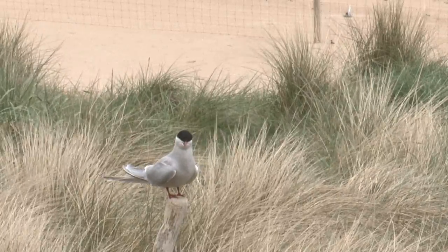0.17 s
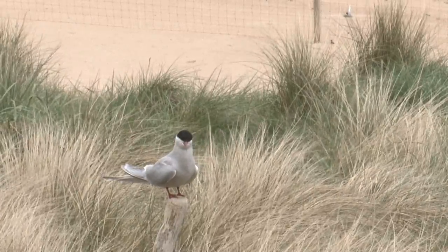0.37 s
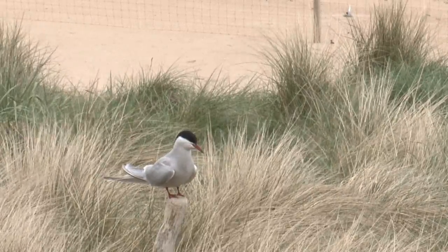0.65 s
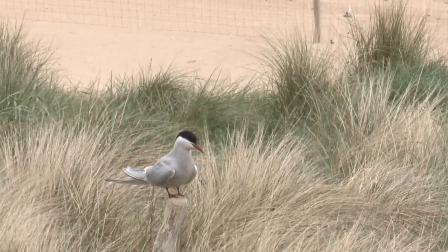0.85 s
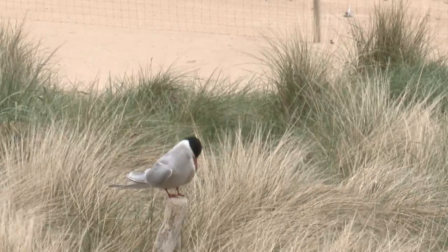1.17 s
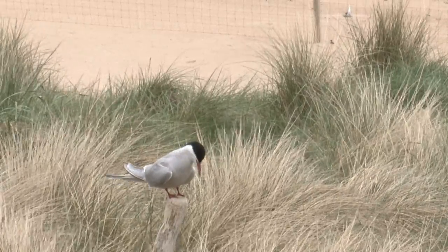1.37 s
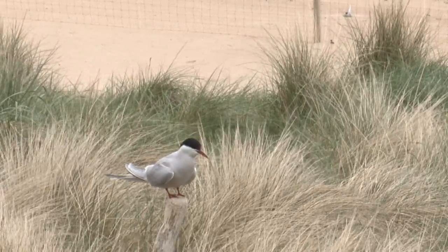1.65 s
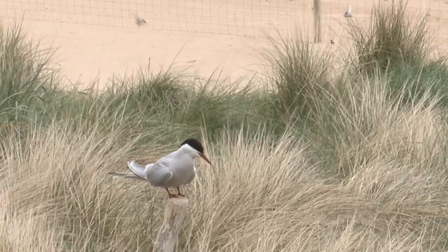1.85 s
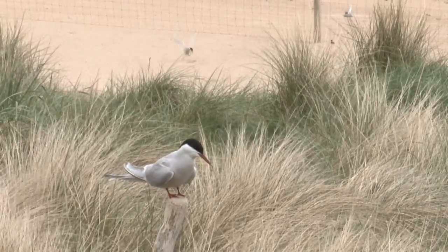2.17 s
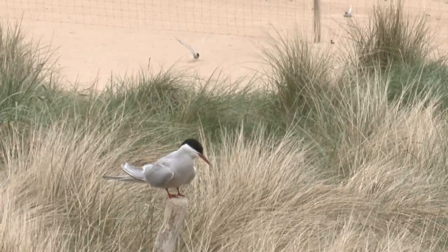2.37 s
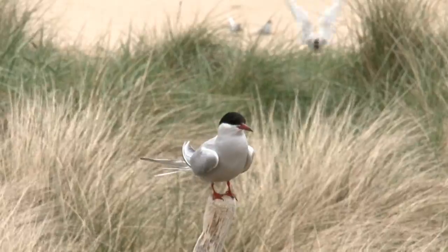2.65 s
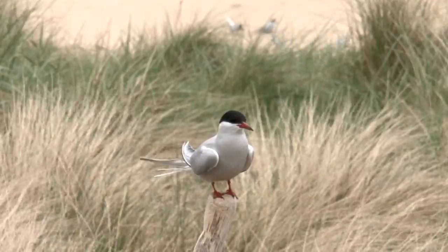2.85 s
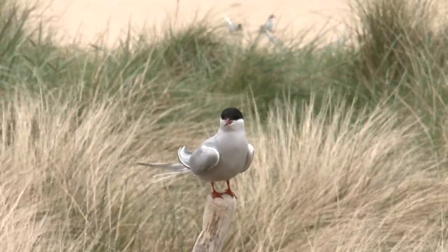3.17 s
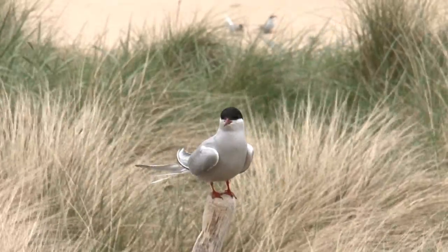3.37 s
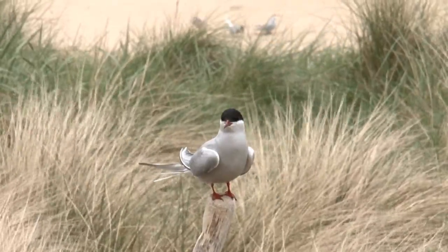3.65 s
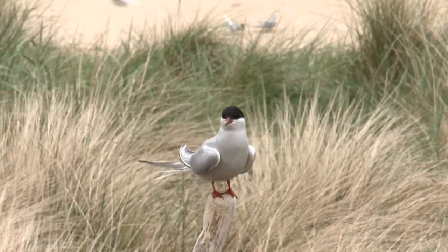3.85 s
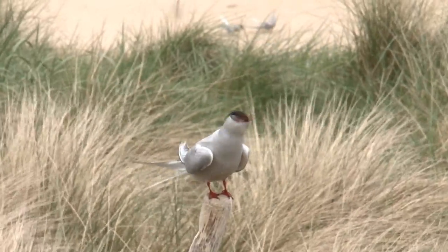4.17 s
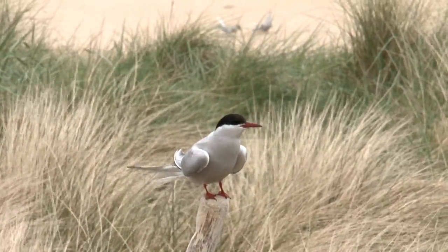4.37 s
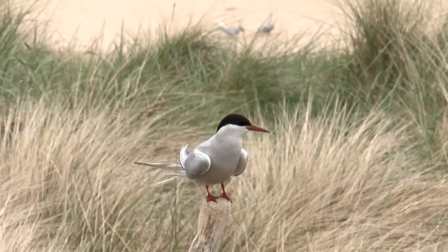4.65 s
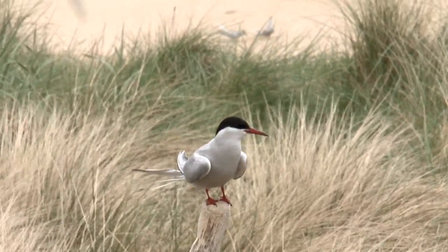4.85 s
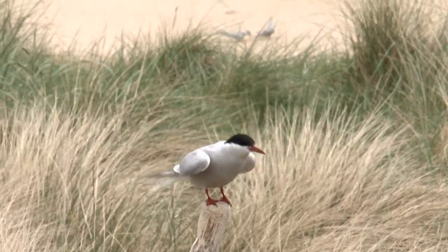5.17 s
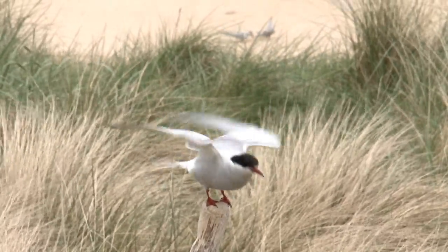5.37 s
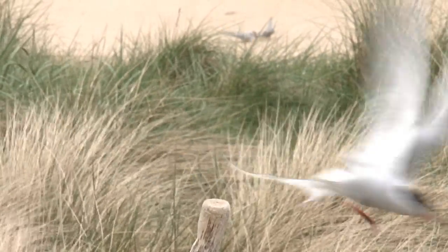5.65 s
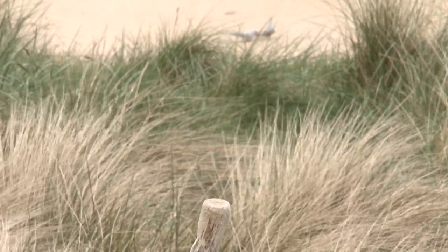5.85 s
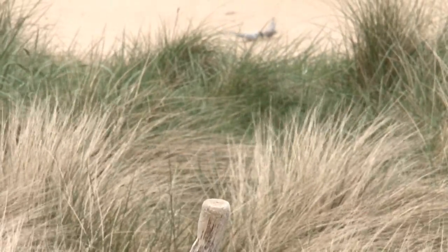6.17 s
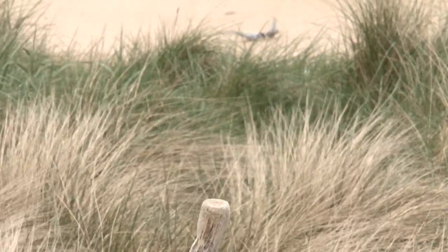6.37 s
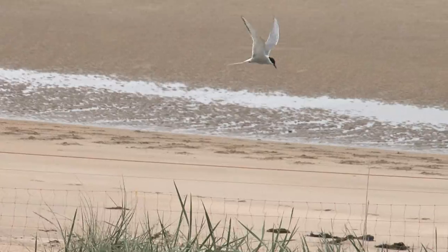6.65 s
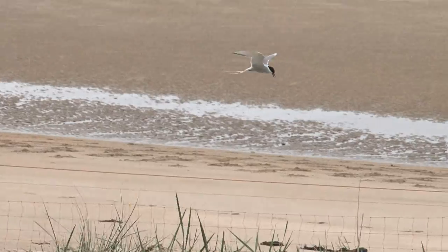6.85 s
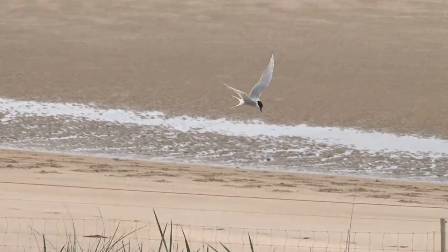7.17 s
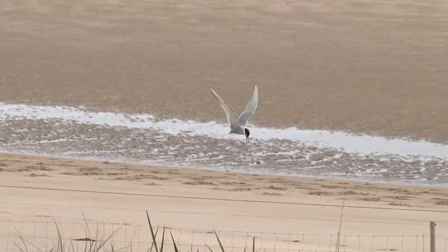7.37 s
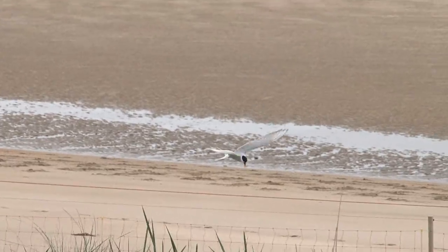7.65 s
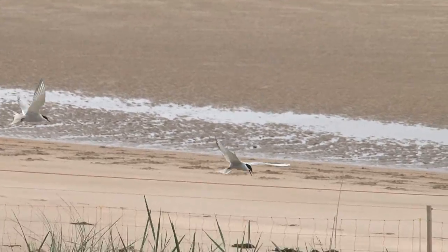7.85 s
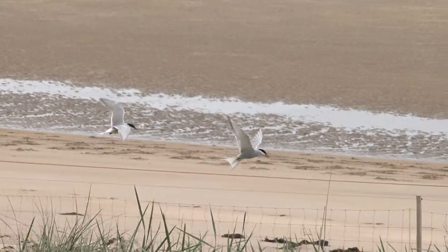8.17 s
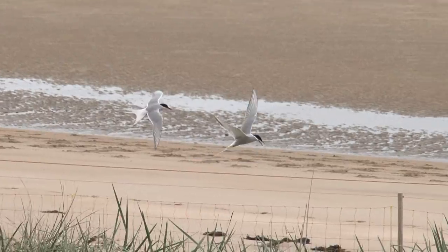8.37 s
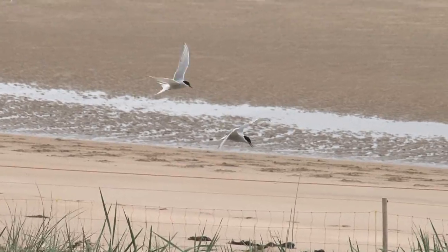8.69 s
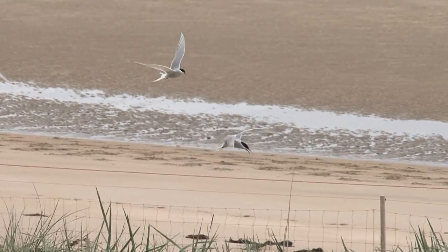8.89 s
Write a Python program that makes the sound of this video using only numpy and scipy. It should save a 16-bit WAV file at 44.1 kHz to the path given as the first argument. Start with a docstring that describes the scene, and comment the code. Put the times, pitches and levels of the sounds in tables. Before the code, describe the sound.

A dense, unbroken chorus of terns calling at once in coastal dunes, shrill chopped kee cries and rasping growls over faint surf.

```python
"""Near terns of a dune colony call: arched whistles with harmonics, chopped into trills ("kee"), and
rasping growls ("arr"), trains of noisy membrane snaps coloured by throat and beak bands.
Hundreds of farther calls by the same rules, and a band of fluttering noise, fuse into a chorus.
Filtered noise gives the surf beyond the dunes and two puffs of wind; wavering sines give a faint low drone.
An almost mono microphone hears it all."""
import sys
import numpy as np
from scipy import signal
from scipy.fft import rfft, irfft, next_fast_len
from scipy.io import wavfile
from scipy.ndimage import uniform_filter1d

SR = 44100
rng = np.random.default_rng(int(sys.argv[2]) if len(sys.argv) > 2 else 0)


def persist_wave(psi):
    """Save psi, clipped to +-1, as 16-bit WAV."""
    counts = np.round(np.clip(psi, -1, 1) * 32767).astype(np.int16)
    wavfile.write(sys.argv[1], SR, np.atleast_2d(counts).T)


N = 397782
TIME = np.arange(N) / SR

# near growls: [start t/s, length t/s, mean burst rate f/Hz, throat level/dB of the buzz before gating,
# beak level/dB and treble level/dB over the throat]
NEAR_GROWLS = [(0, 0.145, 90.2, -29, -1, -20), (0.589, 0.18, 94.7, -29, -5.5, -21),
               (1.114, 0.046, 63, -36, -2, -20), (1.215, 0.14, 63.4, -39, -2, -7.5),
               (1.352, 0.17, 67, -32.5, -4.5, -30), (1.642, 0.26, 66.9, -35, -0.5, -21),
               (2.01, 0.04, 65.5, -32, -19, -17), (3.132, 0.086, 73.44, -30, -7, -22),
               (3.617, 0.061, 59.6, -30.5, -12, -23), (3.727, 0.21, 58, -30.5, -7.5, -34),
               (4.275, 0.13, 73.7, -27, -7.5, -29), (4.39, 0.055, 56, -45, -10, -14),
               (4.455, 0.17, 52, -46, 6, -8), (4.818, 0.1, 67.8, -30, 0.5, -20),
               (5.14, 0.037, 60.19, -30, -5, -23), (5.208, 0.11, 73.4, -26.5, -26, -27),
               (5.319, 0.14, 57, -32, -7, -20), (6.085, 0.11, 62, -42, 2, -8),
               (6.138, 0.14, 44.2, -29.5, -5, -17), (6.298, 0.086, 59.5, -30, -2.5, -19),
               (7.45, 0.14, 72.3, -31, -9, -21), (7.996, 0.13, 54, -30, -5, -17),
               (8.5, 0.185, 92, -26, -8.5, -22.5), (8.894, 0.04, 23, -29.5, -4, -20)]
# growl bands, as filter points [f/Hz, level/dB]: throat, open beak, and the treble that near birds add
THROAT_BAND = [(900, -50), (1700, -12), (2300, -5), (3000, 6), (3700, -9), (4500, -19), (6000, -62)]
BEAK_BAND = [(3000, -20.5), (4000, 6), (4600, 4), (5500, -1.5), (6800, -6.5), (7600, -40)]
TREBLE_BAND = [(6500, -49), (7800, 8.5), (9500, 11.5), (11500, 2), (13500, -4), (15000, -48)]
# near cries: [start t/s, length t/s, pitch f/Hz at the onset, settled, at the end, level/dB before flicker,
# 2nd harmonic level/dB over the 1st, mean trill rate f/Hz, trill depth 0-1]
NEAR_CRIES = [(0.005, 0.098, 3100, 3550, 2500, -33, -12, 92, 0.44),
              (0.175, 0.051, 3050, 3100, 3600, -34, -6, 45.4, 1),
              (0.235, 0.2, 3450, 3660, 3480, -33, -20, 78, .25),
              (0.37, 0.13, 2750, 2450, 2140, -34, -22, 57.6, 1),
              (0.441, 0.16, 3046, 3170, 3300, -33.5, -11, 50.6, .7),
              (0.55, 0.235, 3550, 3940, 3300, -31.5, -18, 48, .9),
              (0.595, 0.075, 3250, 3340, 3200, -32, -6, 53, 1),
              (0.758, 0.23, 3520, 3500, 3560, -32.5, -19, 94.2, 1),
              (0.991, 0.13, 3180, 3200, 3300, -34, -15, 54, 1),
              (1.129, 0.11, 2884, 3280, 3200, -31, -3, 60, 1),
              (1.245, 0.051, 2900, 3400, 2500, -31, -7.5, 62.3, 0.9),
              (1.203, 0.2, 3440, 3340, 3330, -31.5, -16.5, 39.3, 1),
              (1.455, 0.15, 3250, 3800, 3200, -41, -8, 95, 0.66),
              (1.476, 0.072, 3460, 3900, 2500, -40, -9, 48, 1),
              (1.6, 0.24, 3250, 3400, 2980, -30, -16.5, 60.2, 1),
              (1.657, 0.025, 2850, 3100, 2940, -32, 0, 69, 0.9),
              (1.802, 0.08, 2930, 2750, 3500, -39, -7, 67, .85),
              (1.914, 0.043, 3830, 3930, 3810, -33, -43, 43, 0.05),
              (1.941, 0.076, 3020, 3040, 2850, -37, -11, 54, 1),
              (2.145, 0.24, 2650, 2970, 2670, -34.5, -16, 96.2, 1),
              (2.01, 0.18, 3150, 3180, 2720, -40, -4, 36, .9),
              (2.062, 0.125, 3340, 3450, 3260, -42, -4, 55, 1),
              (2.066, 0.065, 2620, 2750, 2680, -44, 0, 45, .2),
              (2.33, 0.18, 3600, 3900, 3650, -35.5, -12.5, 44, .9),
              (2.359, 0.23, 3590, 3400, 3240, -33, -18, 97.5, 1),
              (2.52, 0.09, 3630, 3900, 2900, -36, -21, 44, 0.4),
              (2.6, 0.17, 3400, 3400, 3100, -32, -16, 47.8, 0.95),
              (2.8, 0.033, 2900, 3600, 3150, -34, -6, 50, .1),
              (2.826, 0.11, 2900, 3260, 2780, -32.5, -8, 60, 1),
              (2.93, 0.2, 3400, 3460, 3330, -31, -14, 65, .8),
              (2.965, 0.2, 3250, 3310, 3150, -29.5, -14, 45, .87),
              (3.167, 0.18, 3300, 2930, 2700, -27.5, -14, 53, 0.92),
              (3.21, 0.18, 3350, 3640, 3250, -43, -2, 60, 1),
              (3.399, 0.25, 2950, 2850, 3500, -36.5, -30, 90, 0.7),
              (3.438, 0.055, 3850, 3940, 3800, -35, -40, 70, .1),
              (3.57, 0.024, 2530, 2300, 2200, -32, -38, 50, .1),
              (3.62, 0.11, 3290, 2950, 3200, -36, -17, 46.5, .95),
              (3.716, 0.24, 3330, 3500, 3800, -36, -16, 52.3, 0.57),
              (3.744, 0.25, 2670, 2900, 2900, -32.5, -17, 55.4, 1),
              (3.842, 0.16, 3390, 3440, 2900, -33, -15.5, 50.3, 0.42),
              (3.926, 0.11, 2900, 3400, 2920, -36, -14, 58, 0.9),
              (3.985, 0.19, 3250, 3650, 3270, -29, -11, 36, .9),
              (4.169, 0.13, 3550, 3200, 3400, -30, -23, 71, .8),
              (4.22, 0.16, 3350, 3540, 3270, -32, -8, 100, .4),
              (4.385, 0.079, 3740, 3700, 3600, -35, -21, 61, 0.4),
              (4.405, 0.055, 2850, 3260, 3020, -28, -12, 50, .2),
              (4.453, 0.15, 4380, 4430, 3800, -34, -30, 56, 1),
              (4.575, 0.255, 3450, 3690, 3330, -28.5, -8, 48, 1),
              (4.645, 0.061, 3670, 3730, 3660, -28, -33, 48, .1),
              (4.779, 0.12, 3100, 3530, 3070, -27, -29, 59, 0.98),
              (4.881, 0.22, 3220, 3420, 2730, -30, -11, 45.7, 0.76),
              (5.047, 0.074, 3260, 2800, 3050, -30, -22, 104, .86),
              (5.075, 0.11, 3050, 3270, 3100, -34.5, -10, 42, .2),
              (5.118, 0.12, 2900, 2900, 2100, -32, -23, 91.7, 1),
              (5.115, 0.17, 3380, 3520, 3230, -33, -9, 45, .85),
              (5.2, 0.1, 3320, 3330, 3250, -28.5, -22, 39, .5),
              (5.283, 0.15, 3050, 3000, 2880, -33.5, -7, 50.4, .93),
              (5.421, 0.069, 2850, 3200, 2300, -33, -26, 56.5, 1),
              (5.507, 0.14, 3100, 3440, 2800, -35, -13, 74.3, 1),
              (5.553, 0.17, 2930, 2860, 3000, -34, -20, 53.7, 1),
              (5.581, 0.124, 3340, 3560, 3450, -35, -17, 46.3, 1),
              (5.855, 0.12, 3080, 3280, 3250, -40, -24, 70, 0.6),
              (5.948, 0.12, 2880, 3430, 3350, -30, -8, 68, .9),
              (5.99, 0.225, 2520, 2990, 2720, -33, -8, 42, .8),
              (6.04, 0.29, 3200, 3160, 3340, -27, -17, 67, 0.76),
              (6.09, 0.22, 3400, 3470, 3300, -31, -11, 65, .8),
              (6.241, 0.18, 3120, 3460, 2470, -32, -17, 42, .95),
              (6.632, 0.17, 2900, 2840, 2700, -39.5, -9, 65, 0.7),
              (6.769, 0.12, 2850, 3300, 2400, -37, -6, 63.5, 0.9),
              (6.823, 0.099, 3340, 3520, 3700, -37, -14, 39, .7),
              (6.867, 0.1, 3140, 3260, 3200, -34.5, -12, 46.7, 1),
              (6.984, 0.097, 2870, 2930, 2700, -35, -9, 78, .83),
              (7.036, 0.125, 3790, 3780, 3650, -28, -15.5, 39, .1),
              (7.132, 0.19, 3320, 3500, 3300, -31, -18, 63, 0.74),
              (7.31, 0.097, 2970, 3450, 3300, -35.5, -11, 46, .65),
              (7.39, 0.065, 3900, 3700, 3200, -41, -10, 50, 0.05),
              (7.06, 0.046, 2900, 3300, 3500, -38, -4, 50, .1),
              (6.44, 0.07, 3200, 3550, 3700, -47, -8, 45, .8),
              (6.46, 0.22, 3550, 3500, 3050, -44, -29, 44.4, 0.4),
              (7.72, 0.15, 3330, 3480, 3200, -30.5, -15, 39, .8),
              (7.87, 0.21, 3250, 3300, 2950, -29.5, -14, 38, .8),
              (7.65, 0.29, 3100, 3220, 3150, -36.5, -14, 90.3, 0.76),
              (8.079, 0.2, 3380, 3470, 3440, -31, -21.5, 76.3, .68),
              (8.235, 0.255, 2750, 3140, 2680, -30, -9, 42, .9),
              (8.357, 0.15, 3480, 3460, 3000, -34.5, -10, 47, 0.9),
              (8.417, 0.042, 3900, 3940, 3480, -32, -8, 50, .1),
              (8.455, 0.09, 3500, 3420, 3260, -34, -9, 50, .2),
              (8.68, 0.032, 2980, 3200, 2880, -27, -16, 40, .1),
              (8.682, 0.081, 2620, 2440, 2700, -38, -28, 83, .67),
              (8.72, 0.12, 3500, 3600, 3900, -39.5, -17, 87, .56),
              (8.742, 0.04, 3050, 3600, 3150, -42, -6, 50, .1),
              (8.797, 0.028, 2900, 2800, 2600, -31, -12, 40, .1),
              (8.802, 0.04, 2850, 3480, 2950, -40, -5, 50, .1),
              (8.828, 0.098, 3520, 3600, 3700, -35, -27, 51, 0.9),
              (8.92, 0.13, 3000, 3300, 3100, -31.5, -11, 83.5, 0.73)]
# far chorus over time: [t/s, reference level/dB, nearness as treble level/dB]
FAR_CHORUS = [(0.0, -28.5, -4), (2.28, -30, -7), (3.04, -27, -7.5), (3.64, -33.5, -10), (3.97, -26, -7.5),
              (5.33, -26.5, -10), (5.93, -30, -8), (6.18, -28, -12), (6.48, -27, -9.5), (8.44, -28.5, -10),
              (9.02, -29.5, -15)]
# spectrum of the farthest voices, too many to tell apart: [f/Hz, level/dB]
BLUR_SPECTRUM = [(1500, -39.5), (2200, -1.5), (3100, -2), (4000, -5.5), (5000, -22.5), (6400, -11.5),
                 (7600, -41), (10000, -31.5), (13000, -36), (15000, -55)]
# spectrum of the breakers' hiss: [f/Hz, level/dB]
SURF_SPECTRUM = [(18, -60), (30, -35), (107, -15), (185, -10), (363, -1.5), (792, 0), (1200, -1.5),
                 (2000, -2), (3000, -7), (5000, -20), (8000, -40), (15000, -55)]
# low drone tones: [f/Hz before waver, level/dB before waver, start t/s, end t/s]
DRONE_TONES = [(98, -69, 0.5, 5.5), (127, -62.5, 5.5, 9.1)]
# wind on the microphone: [t/s, level/dB]
WIND_LEVELS = [(0.0, -101), (1.86, -123), (1.98, -51), (2.28, -121), (5.9, -112), (7.71, -84), (8.32, -52),
               (9.02, -96)]
# microphone response: [f/Hz, level/dB]
MICROPHONE_RESPONSE = [(20, -1), (13500, 1), (14600, 0), (15200, -14)]

TRILL_SLOWING = 0.066  # share by which trills and bursts slow from start to end
SETTLE_S = .017  # time constant of the glide from onset to settled pitch
SAG_SHARE, DROP_POWER = .3, 4  # share of the fall that sags evenly; the rest drops late
# the 3rd harmonic follows the 2nd and is stronger in louder, nearer birds
THIRD_DB, THIRD_SLOPE, THIRD_PER_LEVEL = -3.5, 0.61, 0.39
# pitch shares: slow waver, fast jitter, sag to either side within a pulse; then level flicker
WAVER_SHARE, ROUGH_SHARE, DROOP_SHARE, FLICKER_DB = .004, .006, .008, 1.5
BLUR_DB = -9.5  # relative to the far chorus reference
SURF_DB = -39.5  # level of the 300-1500 Hz band, before the swell
TOP_HZ = 15084  # upper band edge of the recorder


def undb(db):
    """Decibel law: a level in dB becomes an amplitude ratio."""
    return 10 ** (np.asarray(db) / 20)


def unit(x):
    """Normalisation: the signal is scaled to rms 1."""
    return x / np.sqrt(np.mean(x ** 2))


def colour(x, points):
    """Linear filtering: the spectrum is weighted by gains interpolated over log frequency."""
    hz, db = np.transpose(points)
    size = next_fast_len(N)
    f = np.maximum(np.arange(size // 2 + 1) * SR / size, 1)
    gain = undb(np.interp(np.log(f), np.log(hz), db))
    return irfft(rfft(x, size) * gain, size)[..., :N]


def walk(rate):
    """Slow random modulation: values drawn rate times a second, smoothed twice, spread near 1."""
    hold = int(SR / rate)
    steps = np.repeat(rng.standard_normal(N // hold + 1), hold)
    smooth = uniform_filter1d(uniform_filter1d(steps, hold), hold)
    return unit(smooth[:N])


def add(track, start, sound):
    """Superposition: a sound is summed into the track at a time in s."""
    i = int(start * SR)
    track[..., i:i + sound.shape[-1]] += sound[..., :max(N - i, 0)]


def trill(length, hz, duty, sharp):
    """Periodic gating at a slowing rate: progress 0-1, place in the cycle, gate and soft ends."""
    u = np.arange(int(length * SR)) / (length * SR)
    cycle = length * hz * u * (1 + TRILL_SLOWING * (1 - u) / 2) % 1
    gate = np.clip(.5 + sharp * (duty / 2 - abs(cycle - .5)), 0, 1)
    ends = np.clip(np.minimum(u, 1 - u) * length / 0.0099, 0, 1)
    return u, cycle, gate, ends


def buzzing(hz=830, jitter=.04, breath=0.46):
    """Irregular pulse excitation: uneven snaps of the voice membranes with turbulent air."""
    phase = np.cumsum(hz * (1 + .08 * walk(6) + jitter * walk(900)) / SR)
    # one snap each time the phase completes a turn
    snaps = np.diff(np.floor(phase), prepend=0) * undb(2.9 * walk(900))
    return unit(unit(snaps) + breath * rng.standard_normal(N))


def growl(tracks, row, buzz):
    """Amplitude-gated buzz: bursts shared among throat, beak and treble tracks for later colouring."""
    start, length, rate, db, beak_db, treble_db = row
    u, _, gate, ends = trill(length, rate, duty=0.57, sharp=19)
    burst = buzz[:len(u)] * gate * ends * np.sin(np.pi * u) ** 0.19
    add(tracks, start, burst * undb([[db], [db + beak_db], [db + treble_db]]))


def cry(track, row, wobble, fourth_db=-9):
    """Harmonic series on a gliding pitch, amplitude-modulated by the trill; pitch sags in each pulse."""
    start, length, onset, settled, end, db, db2, rate, depth = row
    u, cycle, gate, ends = trill(length, rate, duty=0.58, sharp=20)
    depth = np.clip(depth, 0, 1)
    fast, waver, flicker = wobble[:, :len(u)]

    fall = SAG_SHARE * u + (1 - SAG_SHARE) * u ** DROP_POWER
    glide = (onset - settled) * np.exp(-u * length / SETTLE_S)
    arch = settled + glide + (end - settled) * fall
    droop = DROOP_SHARE * depth * (1 - 2 * cycle)
    unsteady = (ROUGH_SHARE * fast + WAVER_SHARE * waver) * np.sqrt(depth)
    hz = arch * (1 + droop + unsteady)

    # powers of one rotating phasor are its harmonics
    first = np.exp(2j * np.pi * np.cumsum(hz) / SR)
    second = first * first
    third, fourth = second * first, second * second
    db3 = THIRD_DB + THIRD_SLOPE * db2 + THIRD_PER_LEVEL * db
    tone = (first + undb(db2) * second + undb(db3) * third + undb(db3 + fourth_db) * fourth).imag

    pulses = unit(1 - depth + depth * gate)
    add(track, start, np.sqrt(2) * tone * ends * pulses * undb(db + FLICKER_DB * flicker))


def flock(cries, growls):
    """Superposed callers: each call reads its unsteadiness or buzz from a random place."""
    whistles, rasps = np.zeros(N), np.zeros((3, N))
    wobble = np.array([walk(500), walk(30), walk(45)])
    buzz = buzzing()
    places = rng.integers(0, N - SR, size=len(cries) + len(growls))
    for row, k in zip(growls, places[len(cries):]):
        growl(rasps, row, buzz[k:])
    for row, k in zip(cries, places):
        cry(whistles, row, wobble[:, k:])
    voices = whistles
    for rasp, band in zip(rasps, (THROAT_BAND, BEAK_BAND, TREBLE_BAND)):
        voiced, steady = colour(np.array([rasp, buzz]), band)
        # the ungated buzz sets the level of each band
        voices = voices + voiced / np.std(steady)
    return voices


def echoes(x, t60, db):
    """Exponentially decaying reverberation: scattered short reflections from sand and grass."""
    t = np.arange(int(t60 * SR)) / SR
    tail = rng.standard_normal(len(t)) * np.exp(-np.log(1000) * t / t60) * (t > .004)
    return x + undb(db) * signal.fftconvolve(x, tail / np.linalg.norm(tail))[:N]


def far_birds(cry_count=520, growl_count=170):
    """Statistical superposition: random calls, by the rules of the near ones, at many levels."""
    s, db, treble_db = np.transpose(FAR_CHORUS)

    c = rng.random((cry_count, 10)).T
    # somebody is always calling: starts are spread evenly, then scattered
    start = N / SR * (np.arange(cry_count) + 4 * c[0]) / cry_count - .15
    top = 2420 + 1600 * (c[1] + c[2]) / 2  # Hz
    # each cry rises steeply to its top and may fall further by the end
    arch = top * (1 - np.array([.13 * c[3], 0 * top, .17 * c[4]]))
    # longer cries are softer
    level = np.interp(start, s, db) - 11 + 11 * (c[5] - .5) - 5 * c[7] ** 3
    rate = 44 + 35 * c[6]
    length = .035 + .2 * c[7] ** 3
    second_db = np.interp(start, s, treble_db) - 6 - 14 * c[9]
    depth = 0.8 + 4.1 * c[8]  # clipped at 1, so most trills are full
    cries = np.vstack([abs(start), length, arch, level, second_db, rate, depth]).T

    g = rng.random((growl_count, 6)).T
    start = abs(N / SR * (np.arange(growl_count) + 3 * g[0]) / growl_count - .15)
    length = 0.058 + 0.2 * g[2]
    rate = 48 + 45 * g[1]
    throat = np.interp(start, s, db) - 10 + 8 * (g[3] - .5)
    beak = -10 + 8 * g[5]
    treble = np.interp(start, s, treble_db) - 20.5 + 10 * g[4]
    growls = np.vstack([start, length, rate, throat, beak, treble]).T
    return flock(cries, growls)


def blur():
    """Incoherent summation: countless voices merge into a band of hiss that flutters at up to trill speed."""
    s, db, _ = np.transpose(FAR_CHORUS)
    air = rng.standard_normal(N) * undb(2.0 * walk(120) + 1.0 * walk(9))
    return unit(colour(air, BLUR_SPECTRUM)) * undb(np.interp(TIME, s, db) + BLUR_DB)


def surf():
    """Broadband noise of distant breakers: a smooth hiss, strongest in the mids, that swells a little."""
    hiss = colour(rng.standard_normal(N), SURF_SPECTRUM)
    band = signal.butter(N=4, Wn=[300, 1500], btype="band", fs=SR, output="sos")
    mids = signal.sosfilt(band, hiss)
    return hiss / np.std(mids) * undb(SURF_DB + .5 * walk(1.83))


def drone():
    """Frequency and amplitude modulation: low sines waver in pitch and level."""
    out = np.zeros(N)
    for hz, db, t0, t1 in DRONE_TONES:
        fade = np.clip(np.minimum(TIME - t0, t1 - TIME) / 0.45, 0, 1)
        level = undb(db + 0.93 * walk(5.7))
        phase = 2 * np.pi * np.cumsum(hz * (1 + 0.02075 * walk(4.6))) / SR
        out += fade * level * np.sqrt(2) * np.sin(phase)
    return out


def wind():
    """Low-frequency noise of wind on the microphone: deep bass that rises in puffs."""
    bass = [(10, 11), (25, -4), (60, 2), (140, -26), (400, -70)]  # f/Hz, level/dB
    puffs = unit(colour(rng.standard_normal(N), bass))
    return puffs * undb(np.interp(TIME, *np.transpose(WIND_LEVELS)))


def scene():
    """Superposition in two channels: birds, leaning very slightly left, over surf, drone and wind."""
    near = echoes(flock(NEAR_CRIES, NEAR_GROWLS), t60=0.13, db=-27)
    far = echoes(far_birds(), t60=.4, db=-10)
    birds = near + far + blur()
    mid = birds + surf() + drone() + wind()
    lean = colour(birds, [(1500, -109), (2500, -31), (4500, -30.5), (7000, -83), (15000, -50)])
    # a faint, time-shifted share of opposite sign in the two channels
    width = colour(np.roll(mid, N // 3), [(30, -42), (100, -47), (300, -37), (1500, -37), (3000, -31),
                                          (5500, -31), (8000, -45), (11500, -40), (13000, -22)])
    return np.array([mid + lean + width, mid - lean - width])


def record(dry):
    """Band limitation: the microphone fades in the top treble and the recorder cuts above it."""
    cut = signal.ellip(10, .2, 80, TOP_HZ, fs=SR, output="sos")
    return signal.sosfilt(cut, colour(dry, MICROPHONE_RESPONSE))


dry = scene()
out = record(dry)
persist_wave(out)
```